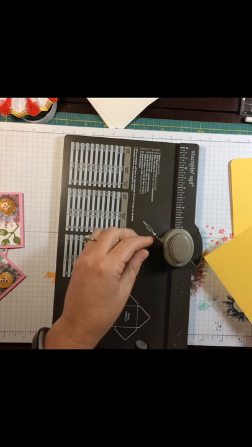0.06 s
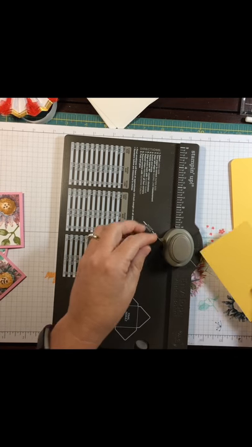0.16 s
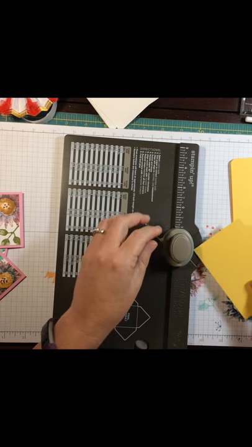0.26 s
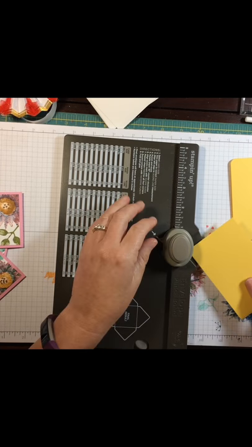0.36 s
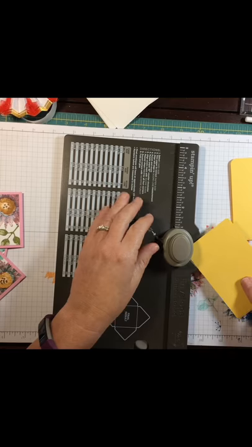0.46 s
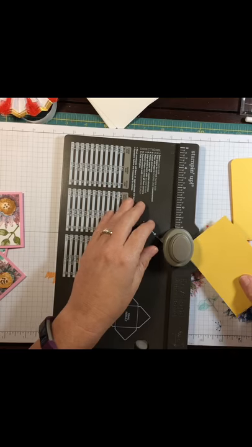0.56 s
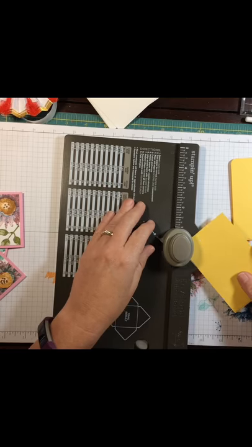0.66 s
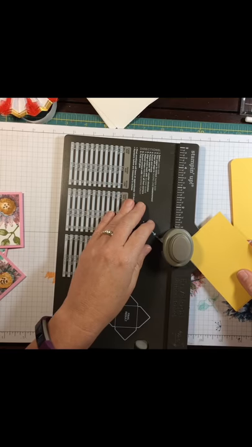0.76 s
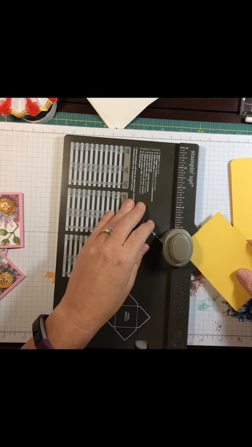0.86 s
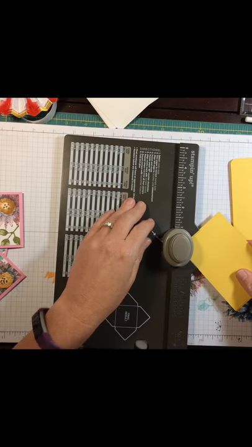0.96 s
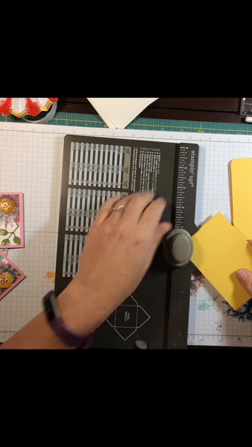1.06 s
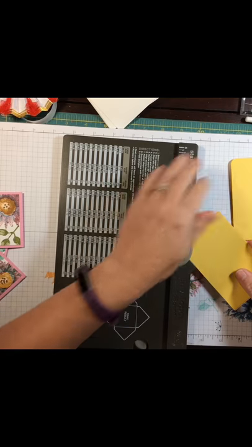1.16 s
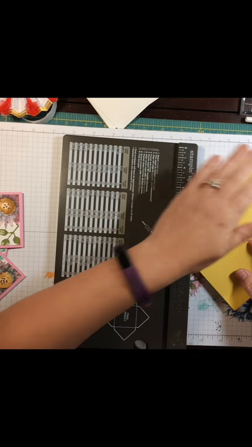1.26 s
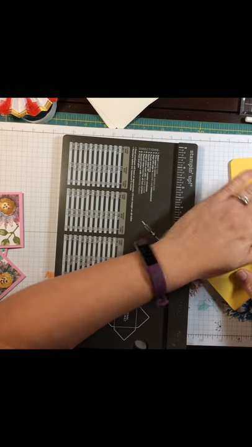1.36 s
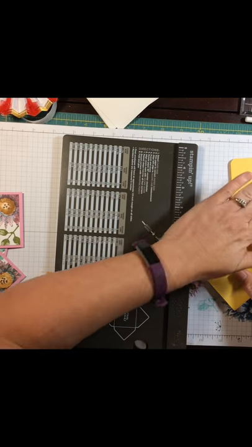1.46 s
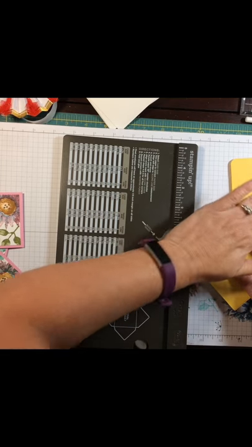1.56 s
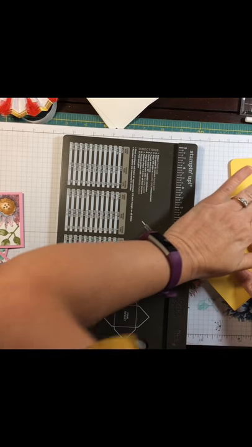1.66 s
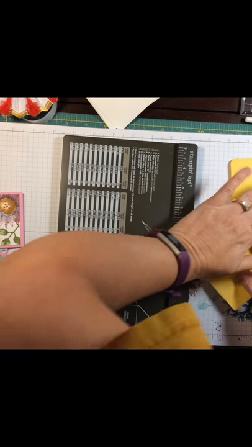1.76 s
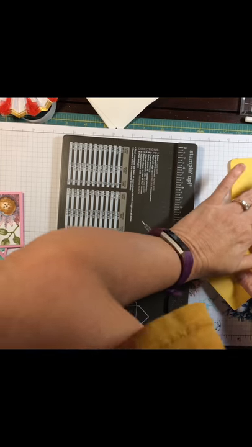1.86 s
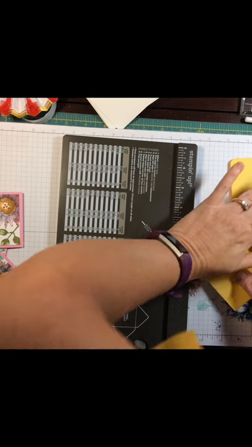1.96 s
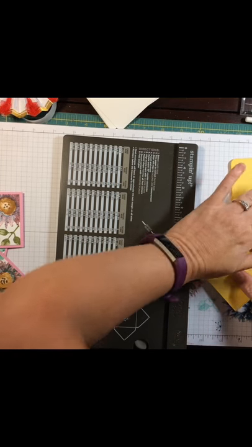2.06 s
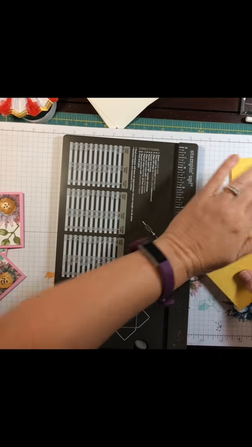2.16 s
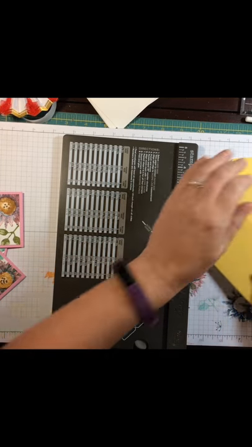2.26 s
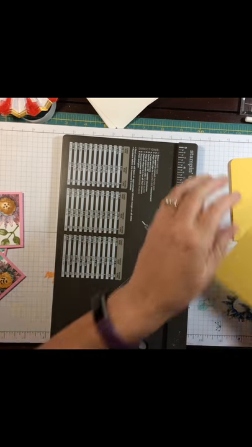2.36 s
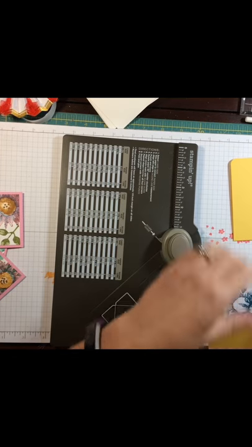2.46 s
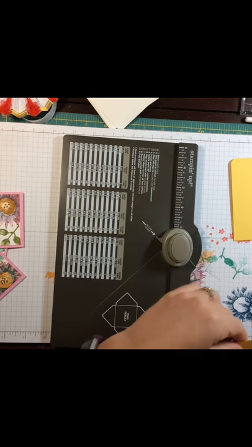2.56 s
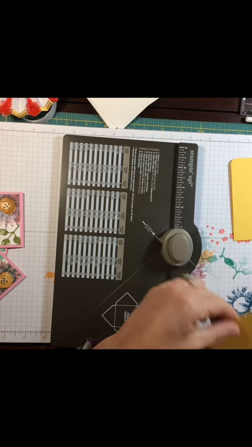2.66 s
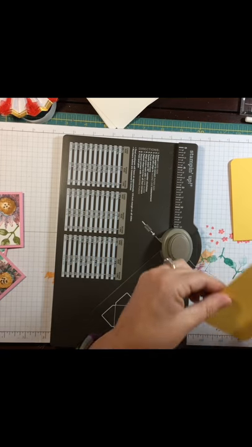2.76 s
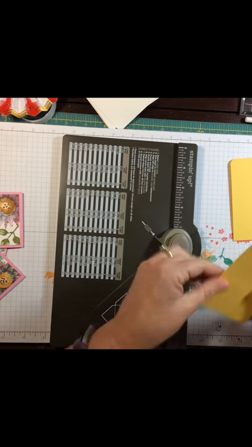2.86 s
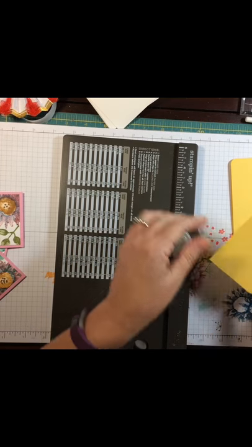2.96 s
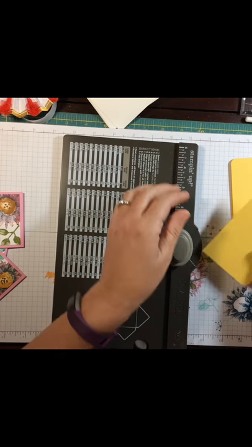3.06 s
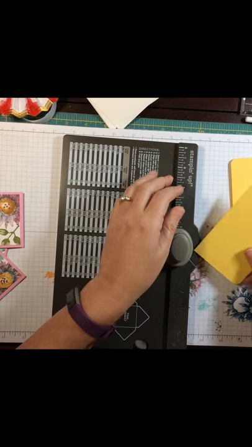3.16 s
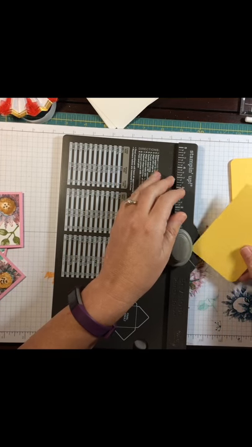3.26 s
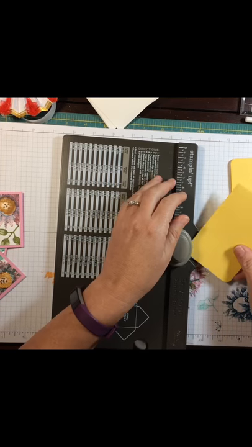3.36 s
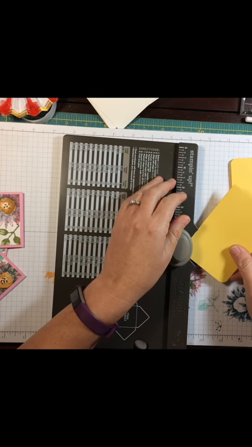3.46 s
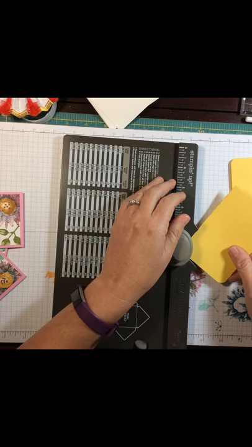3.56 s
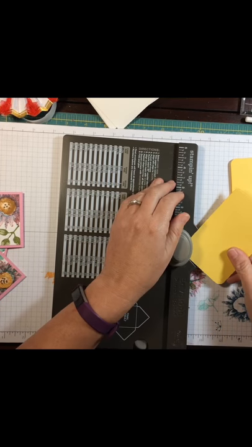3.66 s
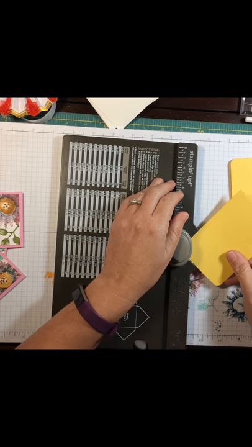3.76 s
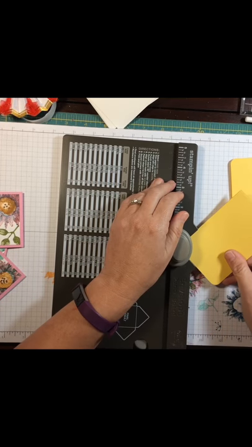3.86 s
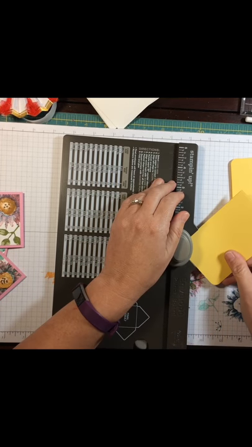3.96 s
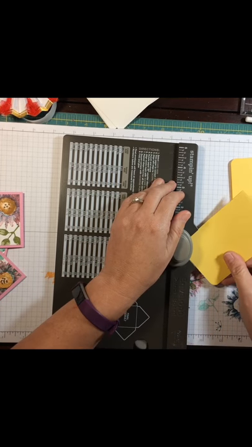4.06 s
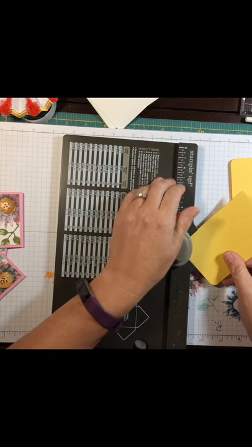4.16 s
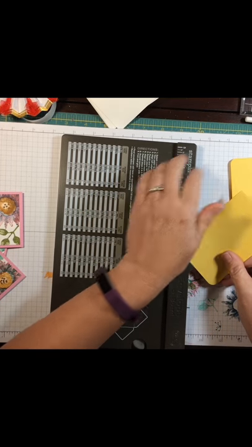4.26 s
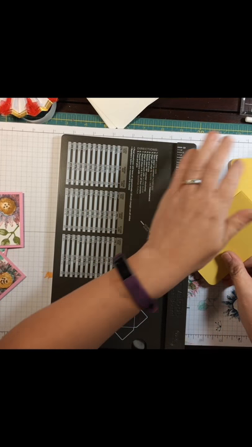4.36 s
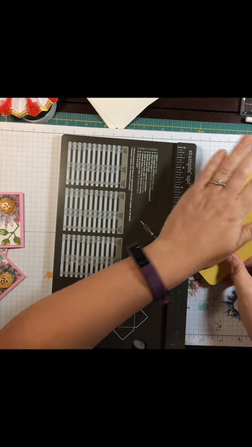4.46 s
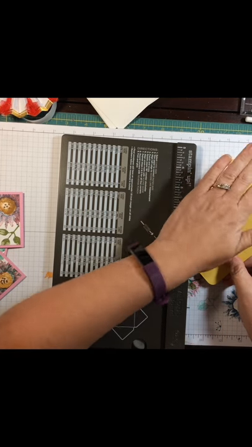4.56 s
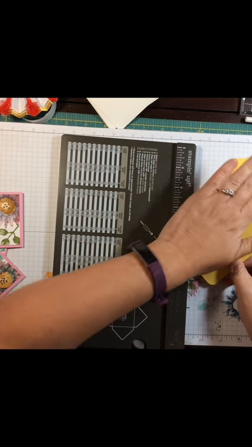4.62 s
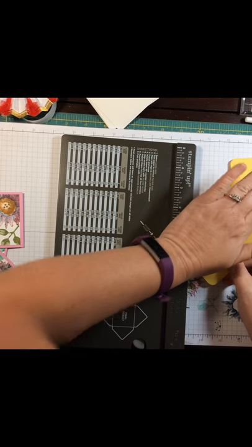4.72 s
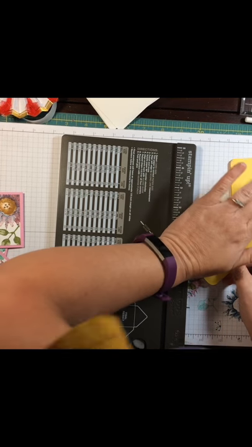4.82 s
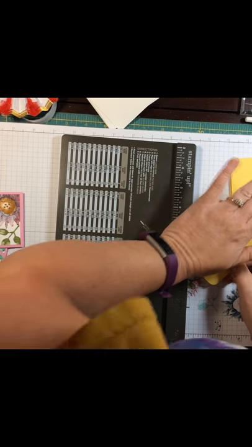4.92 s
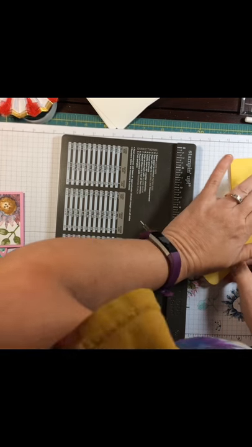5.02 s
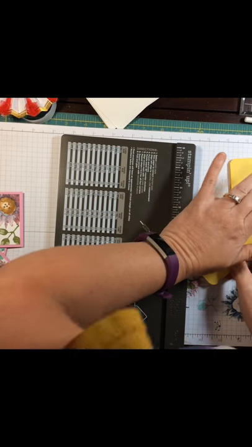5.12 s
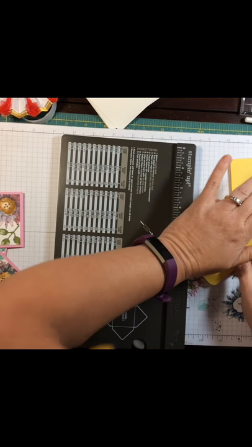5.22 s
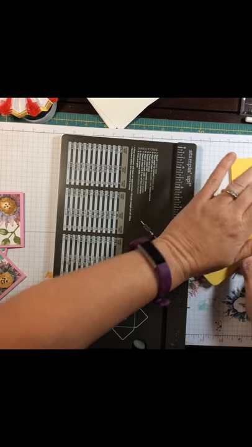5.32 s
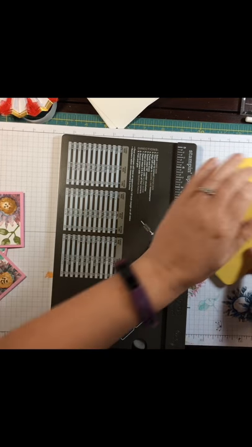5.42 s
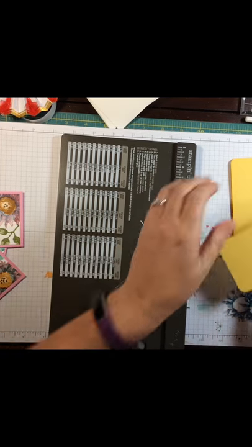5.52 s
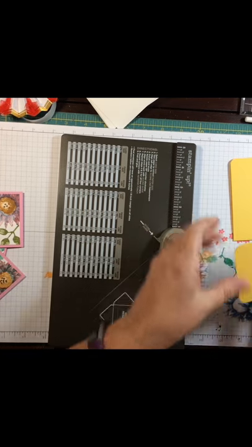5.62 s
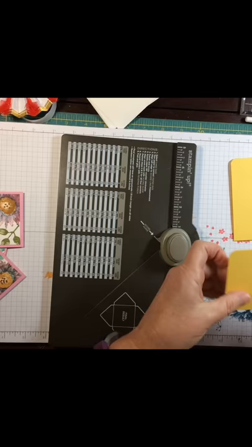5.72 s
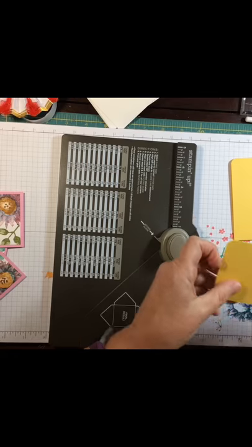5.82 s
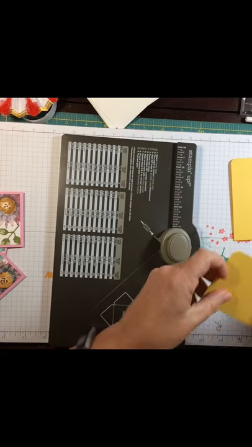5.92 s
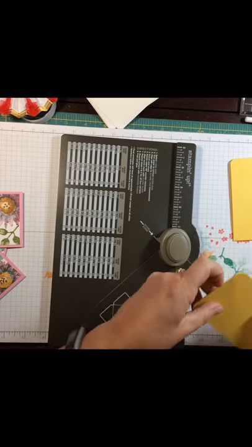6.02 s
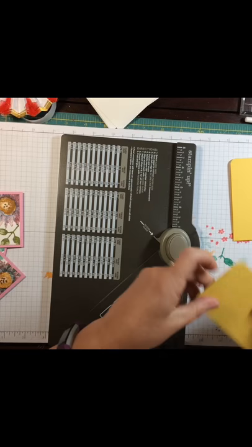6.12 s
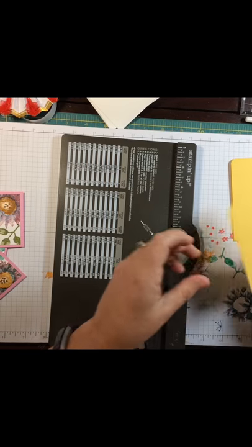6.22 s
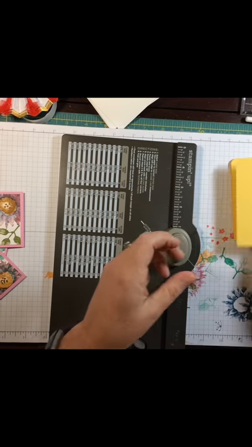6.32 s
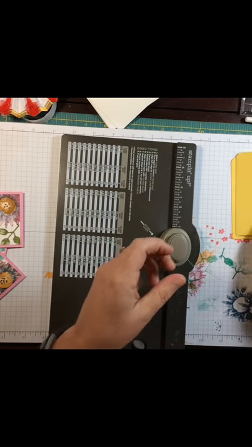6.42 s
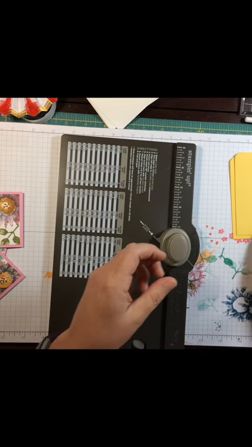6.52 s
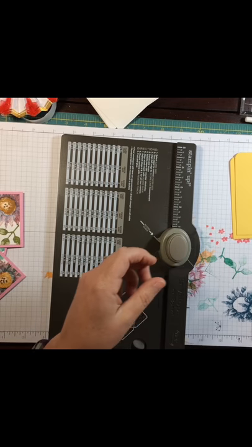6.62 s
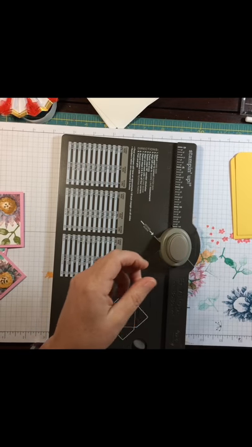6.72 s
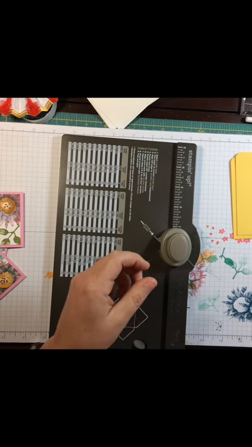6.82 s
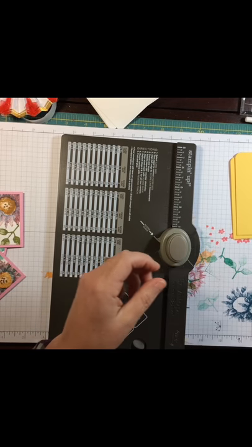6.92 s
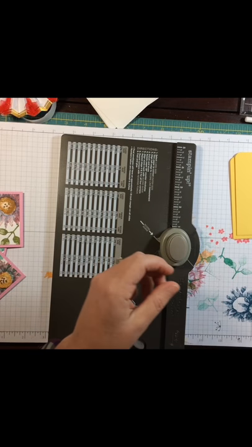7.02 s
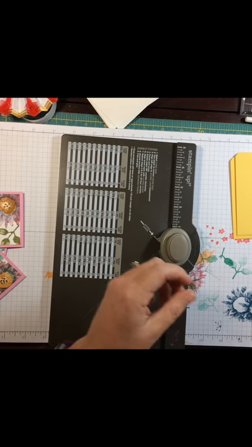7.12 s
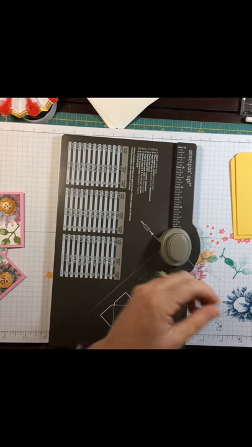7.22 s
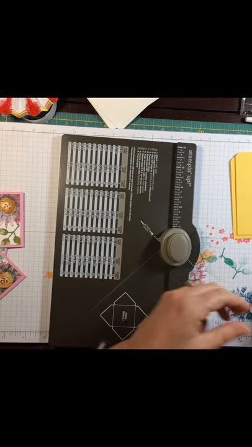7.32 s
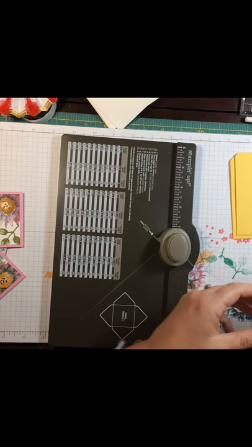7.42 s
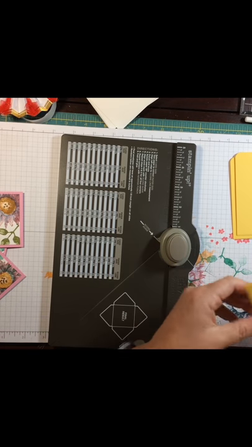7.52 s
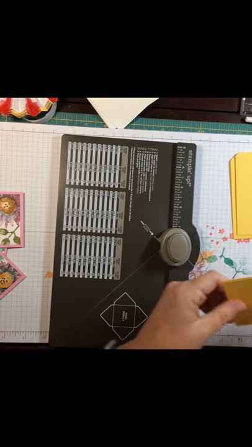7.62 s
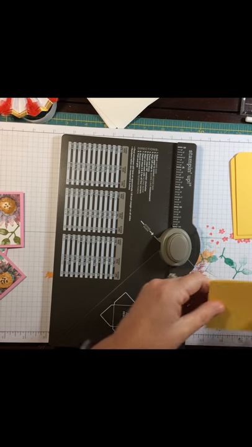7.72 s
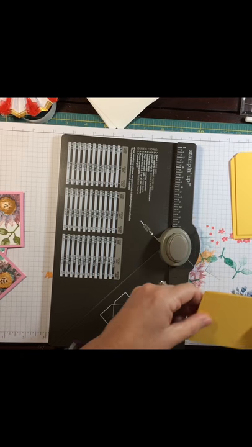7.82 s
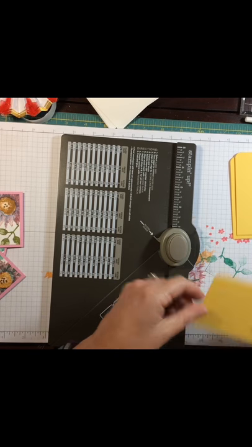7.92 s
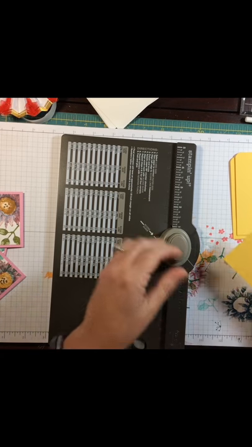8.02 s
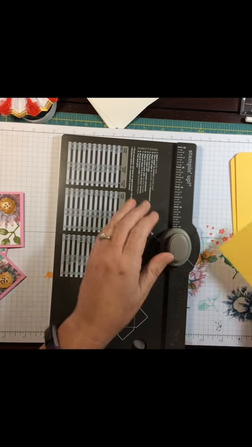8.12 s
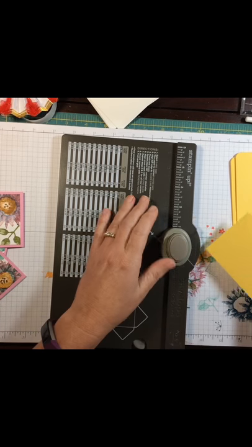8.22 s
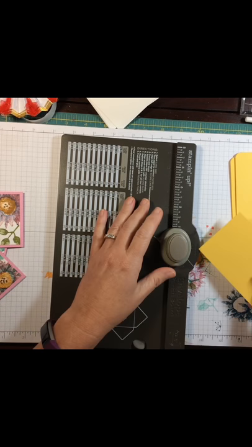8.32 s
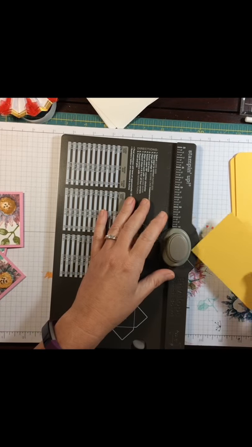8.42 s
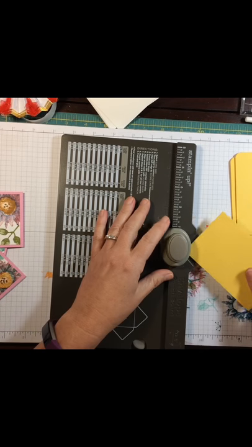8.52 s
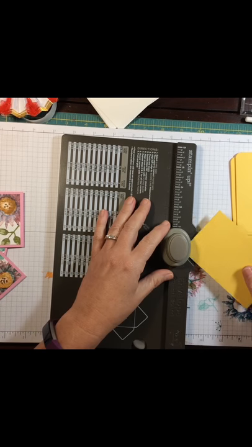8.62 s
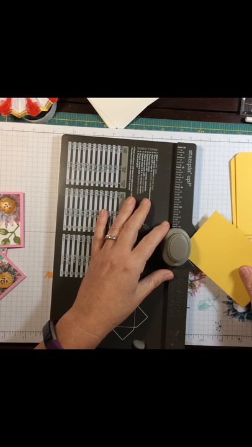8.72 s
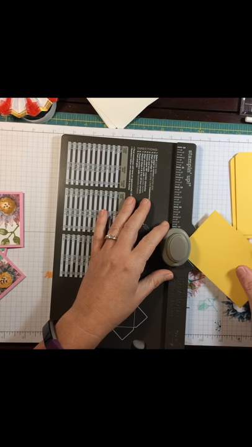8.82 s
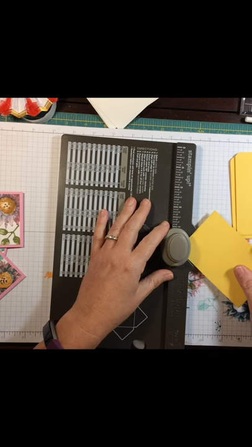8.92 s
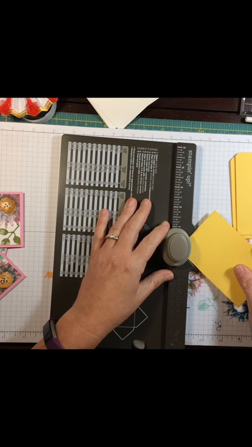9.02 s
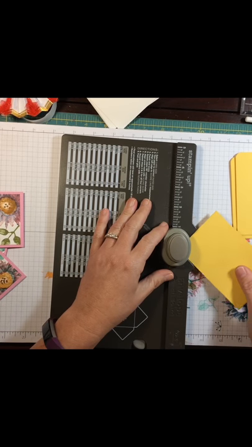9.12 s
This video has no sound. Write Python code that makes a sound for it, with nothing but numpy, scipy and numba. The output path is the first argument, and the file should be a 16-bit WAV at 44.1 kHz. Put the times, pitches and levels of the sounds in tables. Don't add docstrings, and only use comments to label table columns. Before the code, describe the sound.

Two loud, heavy clacks of a hand-pressed paper punch, with light card slides, taps and small scraps dropping in a quiet room.

```python
import sys
import numpy as np
from scipy import signal
from scipy.fft import rfft, irfft, next_fast_len
from scipy.io import wavfile
from scipy.ndimage import uniform_filter1d
from numba import njit

SR = 44100
rng = np.random.default_rng(int(sys.argv[2]) if len(sys.argv) > 2 else 0)


def gain_from_db(level_db):
    decades = np.asarray(level_db, float) / 20
    return 10 ** decades


def output_pcm(signal):
    pcm = np.clip(np.atleast_2d(signal).T, -1, 1) * 32767
    wavfile.write(sys.argv[1], SR, np.round(pcm).astype(np.int16))


N = 404838

# f/Hz, width/Hz, level/dB
MAT_MODES = [(138, 53, -1.1), (200, 61, -0.84), (250, 470, -0.85)]


def unit(x):
    return x / np.sqrt(np.mean(x ** 2))


def band(x, lo_hz, hi_hz):
    limits = [lo_hz, min(hi_hz, .45 * SR)]
    return signal.sosfilt(signal.butter(2, limits, "band", fs=SR, output="sos"), x)


def noise():
    return rng.standard_normal(N)


def coloured(points):
    size = next_fast_len(N)
    hz = np.fft.rfftfreq(size, 1 / SR)
    point_hz, point_db = np.array(points).T
    colour = gain_from_db(np.interp(np.log(hz + 1), np.log(point_hz), point_db))
    return unit(irfft(rfft(rng.standard_normal(size)) * colour, size)[:N])


def walk(rate):
    k = int(SR / rate)
    held = np.repeat(rng.standard_normal(N // k + 1), k)
    return unit(uniform_filter1d(uniform_filter1d(held, k), k)[:N])


def curve(table, column, edge_db=-120.):
    rows = np.array(table)
    return np.interp(np.arange(N) / SR, rows[:, 0], rows[:, column], left=edge_db, right=edge_db)


def ring(modes, push, detune=1., tilt_db=0.):
    hz, width, db = np.array(modes).T[:, :, None]
    t = np.arange(SR // 14) / SR
    free = gain_from_db(db + tilt_db) * np.exp(-np.pi * width * t) * np.sin(2 * np.pi * hz * detune * t)
    sound = signal.fftconvolve(free.sum(0), push)[:len(t)]
    return sound / np.abs(sound).max()


def add(out, s, sound):
    i = int(s * SR)
    out[i:i + len(sound)] += sound[:N - i]


def air():
    # f/Hz, level/dB per Hz
    air_colour = [(15, -50), (25, -4.5), (113, 5), (242, -7), (1010, -16.5), (2000, -24), (6020, -22.5),
                  (14700, -29)]
    # t/s, level/dB
    rumble_levels = [(0, -66.5), (.6, -71), (1.6, -67), (2.8, -71.5), (3.4, -69), (4.6, -69.5), (5, -67),
                     (5.4, -71), (6.2, -69), (7.5, -72), (9.18, -72.5)]
    # t/s, level/dB
    whistle_levels = [(0, -80), (2.5, -77.5), (5, -80.5), (7, -86.5), (9.18, -103)]
    # f/Hz, width/Hz, level/dB
    hum_bands = [(417, 77, -87.5), (640, 44, -90.5), (1085, 25, -89)]
    still = gain_from_db(-67.5) * coloured(air_colour)
    rumble = gain_from_db(curve(rumble_levels, 1, -72.) + .6 + 1.6 * walk(8)) * unit(band(still, 42, 120))
    whistle = gain_from_db(curve(whistle_levels, 1, -85.)) * unit(band(noise(), 5700, 7200))
    hums = sum(gain_from_db(db) * unit(band(noise(), hz - width / 2, hz + width / 2))
               for hz, width, db in hum_bands)
    return band(still, 200, 13500) * gain_from_db(1.5 * walk(5)) + rumble + whistle + hums


def strokes_of_card():
    # start t/s, end t/s, loudest level/dB, body share/dB
    rushes = [(0.552, 0.613, -72, 6), (2.146, 2.185, -58, 0), (2.214, 2.227, -65, 2),
              (2.706, 2.802, -66.5, -14.5), (3.905, 3.93, -56, 1), (5.327, 5.388, -56, 1.5),
              (5.434, 5.536, -64, -2), (5.752, 5.801, -61.5, -4), (6.212, 6.285, -73, -13.5),
              (6.406, 6.421, -73, -18.5), (6.436, 6.49, -69, -14), (6.553, 6.582, -52, -9),
              (6.92, 6.985, -63, -10), (7.181, 7.215, -53, -3), (7.321, 7.387, -50.5, -7.5),
              (8.055, 8.111, -58, -5.5), (8.769, 8.8, -78, 6.5)]
    # start t/s, end t/s, loudest level/dB, body share/dB
    settles = [(2.233, 2.304, -68.5, -1), (2.63, 2.706, -65.5, -2.5), (3.5, 3.529, -70.5, 8.5),
               (5.384, 5.43, -58, 0), (5.839, 5.951, -72.5, -12), (6.482, 6.505, -60, -10),
               (7.272, 7.326, -69, -2.5), (7.529, 7.573, -67, -12), (8.805, 8.877, -59.5, 2.5)]
    # start t/s, end t/s, level/dB, body share/dB
    drags = [(0.458, 0.551, -82, 1.5), (.61, 0.713, -79, 5.5), (0.712, 0.787, -79.5, 6.5),
             (1.586, 1.598, -72, -1), (1.153, 1.21, -77.5, -0.5), (2.3, 2.372, -70.5, -6.5),
             (2.807, 2.898, -76, -13), (2.923, 3.06, -77.5, -8.5), (3.05, 3.203, -74, -5),
             (3.211, 3.236, -70, 4), (3.47, 3.494, -66.5, 4.5), (3.93, 3.963, -82.5, 7),
             (4.281, 4.364, -75.5, 4.5), (5.578, 5.609, -73.5, -14), (5.62, 5.67, -76, -10.5),
             (6.556, 6.57, -64, -12), (6.59, 6.637, -75, 5), (7.016, 7.076, -62, -8.5),
             (7.089, 7.189, -70, -5), (7.216, 7.253, -51, -3.5), (7.409, 7.504, -79, -10),
             (7.671, 7.722, -71.5, -13), (7.717, 7.824, -67.5, -14), (7.832, 7.899, -79, -19),
             (7.93, 7.989, -77, -5.5), (7.992, 8.048, -66.5, -8), (8.595, 8.633, -78, -2),
             (8.621, 8.745, -79.5, -2.5), (7.199, 7.25, -63.5, -2.5), (9.057, 9.099, -73.5, 1),
             (9.111, 9.181, -71.5, 0.5)]
    strokes = [(start, end, -75.5, db, body_db) for start, end, db, body_db in rushes]
    strokes += [(start, end, db, -77, body_db) for start, end, db, body_db in settles]
    return strokes + [(start, end, db, db, body_db) for start, end, db, body_db in drags]


def slides():
    grains = noise() * gain_from_db(2.9 * np.minimum(rng.exponential(size=N), 6.) + 2.1 * walk(110))
    body = unit(band(grains, 950, 2900))
    hiss = unit(band(grains, 2100, 6800))
    sheen = unit(band(grains, 6000, 13500)) * gain_from_db(1.1325 * walk(36))
    flutter = .14 * unit(band(grains, 2800, 3400))
    hiss = unit(hiss + flutter) * gain_from_db(1.7 * walk(60))
    out = np.zeros(N)
    fade = .015
    for start, end, start_db, end_db, body_db in strokes_of_card():
        i = int((start - fade) * SR)
        length = int((max(end - start, 0) + 2 * fade) * SR)
        edges = signal.windows.tukey(length, min(4 * fade * SR / length, 1))
        sheen_db = -7 - .61 * body_db - .25 * (max(start_db, end_db) + 70)
        rub = (hiss + gain_from_db(body_db) * body + gain_from_db(sheen_db) * sheen)[i:i + length]
        level = gain_from_db(2.0 + np.linspace(start_db, end_db, length)) * edges
        add(out, start - fade, level[:len(rub)] * rub)
    return out


def squeaks():
    squeak_notes = [
        (.44, .62, 5100, -78),
        (7.02, 7.07, 3100, -70),
        (7.195, 7.25, 3000, -58),
        (5.47, 5.525, 5000, -72),
        (5.485, 5.545, 1950, -74),
        (4.94, 5.0, 3400, -79),
    ]
    out = np.zeros(N)
    for start, end, hz, db in squeak_notes:
        length = int((end - start) * SR)
        squeak = unit(band(rng.standard_normal(N // 8), .97 * hz, 1.03 * hz))[-length:]
        add(out, start, gain_from_db(db) * signal.windows.tukey(length) * squeak)
    return out


def contacts():
    # t/s, card level/dB, edge snap share/dB, card ring f/Hz
    flicks = [(0.591, -54, -13.5, 2000), (0.9023, -60, 0.5, 2200), (2.2166, -51, -19, 1338),
              (2.349, -60, -13, 1861), (3.478, -43, -15, 2030), (3.4936, -62, 10.5, 1790),
              (4.1765, -53, -19, 1830), (4.3017, -58.5, -15.5, 2804), (5.187, -59, -6, 2230),
              (5.8378, -47.5, 2.5, 4512), (5.8562, -58, -7, 2030), (6.1316, -55, 1.5, 1350),
              (6.1545, -54, -4, 3300), (6.283, -63, -3, 5400), (6.4665, -54, -9, 1976),
              (6.483, -38, 3, 1466), (6.9217, -50.5, -4.5, 3050), (6.9717, -52, -3, 2990),
              (7.2406, -41.5, -2, 3240), (7.378, -41, 2, 4044), (7.3862, -41, 0, 3810),
              (7.5393, -50.5, 2.5, 5291), (7.6572, -53, 0, 4291), (7.669, -51.5, -2, 2667),
              (7.7264, -54, 0, 1285), (8.209, -59, -17, 4310), (8.5935, -55.5, -21.5, 1869),
              (8.7803, -56, -21, 1871), (8.8039, -49.5, -14, 1931), (8.8229, -40, -22, 1443)]
    # t/s, board level/dB, thud share/dB, hardness/dB, card ring f/Hz
    knocks = [(1.5328, -46, -6.5, -16, 1280), (1.664, -50.5, -0.5, -8, 1340), (1.7236, -47, -6, -4, 1800),
              (1.755, -59, 5, 2.5, 2300), (1.8007, -44, -6, -2.5, 1412), (2.168, -53, 6, 2.5, 1294),
              (2.1815, -33.5, -12, 6.5, 2250), (2.186, -36, -6, 3, 3050), (2.2589, -53, -9, 2, 1346),
              (2.6367, -49, -13, 2, 1282), (2.91, -49.5, -6, 4, 2900), (2.9857, -56, -25, 0, 1310),
              (3.9255, -54, -18, -0.5, 1335), (4.6531, -43.5, -9, -22.5, 1375),
              (4.6712, -49, -28, -18.5, 1333), (4.8116, -52, -2, -28, 1301), (4.8925, -44, 0, -13, 1500),
              (4.8985, -43.5, 0.5, -3, 3200), (4.9874, -52, -8.5, 1.5, 3452),
              (5.3554, -46, -14, -17.5, 1300), (5.3774, -33, -9, 2, 2030), (5.3795, -37, -5.5, 3, 4700),
              (6.5735, -48, -12.5, 6.5, 4700), (6.577, -37.5, -11, 6, 5200)]
    # t/s, card level/dB, edge snap share/dB, card ring f/Hz
    scraps = [
        (1.897, -50.5, 12.5, 4700),
        (1.915, -55.5, 4, 4720),
        (5.089, -45, 7.5, 4690),
        (5.1042, -57, 4, 4700),
    ]
    rows = [(s, db + thud_db, db, db + hard_db, db + hard_db - 8, hz)
            for s, db, thud_db, hard_db, hz in knocks]
    return rows + [(s, db - 21, db - 12, db, db + edge_db, hz) for s, db, edge_db, hz in scraps + flicks]


def taps():
    # f/Hz, width/Hz, level/dB
    board_modes = [(300, 30, -10), (454, 100, 7), (686, 300, 12), (839.4, 79, -6), (961.5, 230, -3),
                   (1200, 93, -7), (1440, 600, -36)]
    card_modes = [(1630.3, 1600, -4.5), (2220, 660, -6), (3500, 760, -9), (5000, 490, -8)]
    edge_modes = [(6930, 1700, 20), (7900, 1000, 8), (11000, 2500, -2.5), (13500, 2100, -9.5)]
    out = np.zeros(N)
    t = np.arange(1024) / SR
    first_touch = 1.8 * np.exp(-((t - .0002) / .00003) ** 2)
    for s, mat_db, board_db, card_db, edge_db, hz in contacts():
        grit = rng.standard_normal(1024)
        spot_pitch, spot_level = rng.standard_normal((2, 26, 1))
        size = np.sqrt(hz / 2600)
        card = [(f * size, w * size, g) for f, w, g in card_modes] + [(hz, 0.17 * hz, 0.5)]
        bodies = ((MAT_MODES, mat_db, .003), (board_modes, board_db, .0025),
                  (card, card_db, .0025), (edge_modes, edge_db, .002))
        for modes, db, contact_s in bodies:
            push = grit * np.exp(-t / contact_s) * np.clip(t / 0.00019, 0, 1) - first_touch
            push = band(push, modes[0][0], 1.1 * max(modes)[0])
            count = len(modes)
            add(out, s, gain_from_db(db) * ring(modes, push, 1 + 0.035 * spot_pitch[:count], 1.5 * spot_level[:count]))
    return out


def thumps_and_ticks():
    # t/s, level/dB, f/Hz,
    # width/Hz
    short_knocks = [(0.9025, -46, 2100, 250), (1.546, -54, 900, 400), (4.83, -50, 160, 60),
                    (4.827, -56, 1050, 300), (4.986, -50, 700, 200), (4.994, -48, 750, 250),
                    (5.381, -36, 1300, 500), (6.5775, -33, 1700, 700), (6.5775, -40, 6900, 1200),
                    (9.0385, -40, 2700, 300), (9.0425, -41, 3300, 300), (5.362, -48, 620, 150),
                    (5.368, -47, 600, 150), (6.214, -60, 600, 250), (6.574, -36, 4300, 900),
                    (1.6, -52.5, 700, 200), (1.725, -41, 260, 250), (1.755, -50.5, 1100, 300),
                    (1.822, -15, 640, 170), (5.0081, -13, 600, 170), (5.0895, -44, 8500, 900),
                    (5.1065, -50, 8400, 900), (6.5773, -38, 3940, 500), (2.1155, -56, 3000, 900),
                    (2.169, -49, 4300, 698), (2.1824, -33, 1200, 250), (2.1871, -31, 370, 130.7),
                    (2.1902, -32, 760, 130), (2.195, -40, 700, 200), (3.9267, -34.5, 1350, 350),
                    (3.9272, -39.5, 780, 200), (3.93, -46, 1200, 200), (4.8978, -33.5, 950, 220),
                    (4.8992, -26, 229.5, 200), (5.3565, -48, 602, 100), (5.378, -29.5, 660, 150),
                    (5.383, -35, 814, 120), (5.3865, -33.5, 800, 150), (5.393, -42, 700, 200),
                    (6.578, -28, 340, 150), (6.604, -46, 330, 60), (6.9713, -41, 2890, 250),
                    (7.197, -52, 3040, 300), (7.243, -47, 188, 50), (7.54, -55.5, 450, 150),
                    (8.767, -56.5, 2000, 400), (9.021, -58, 2810, 700), (9.026, -46, 8040, 2500),
                    (2.9105, -51, 1900, 300), (2.9105, -55, 3500, 500), (3.214, -55, 1800, 700),
             (5.379, -33, 1800, 600), (6.5776, -42, 9500, 3000), (9.0318, -43, 11200, 2500),
             (9.0322, -29, 1500, 800), (9.0345, -44, 7300, 900), (9.041, -52, 10500, 2500)]
    out = np.zeros(N)
    for s, db, hz, width in short_knocks:
        push = np.hanning(3 + int(SR / hz / 3))
        add(out, s, -gain_from_db(db) * ring([(hz, width, 0), (1.3 * hz, width, -4)], push))
    return out


def creak():
    presses = [
        (1.502, 1.79, -72.5, -67),
        (2.103, 2.32, -71.5, -78),
        (4.628, 4.972, -77, -70.5),
        (5.302, 5.459, -74, -74),
        (6.544, 6.682, -75, -78),
        (7.194, 7.28, -78, -67.5),
    ]
    slips = noise() * gain_from_db(2.4 * walk(110))
    colour = unit(band(slips, 150, 420)) + 0.67 * unit(band(slips, 420, 910))
    pressure = sum(gain_from_db(curve([(start, start_db), (end, end_db)], 1) + 1.0)
                   for start, end, start_db, end_db in presses)
    return unit(colour) * pressure


def punch():
    # t/s, table level/dB, plate level/dB, steel level/dB, direction (1 or -1)
    strokes = [
        (1.81, -29, -47, -64, -1),
        (1.8201, -11.5, -9, -27.5, 1),
        (1.8242, -40, -11.5, -14.5, -1),
        (1.8254, -10, -5, -19, -1),
        (1.8267, -8, -8, -26, 1),
        (4.9975, -28, -53.5, -67, -1),
        (5.0066, -10, -11.5, -27, 1),
        (5.0113, -26, -6.5, -10.5, -1),
        (5.0126, -39.5, -4.5, -17, -1),
        (5.0155, -13.5, -8, -23, 1),
    ]
    # t/s, level/dB
    loads = [
        (1.8165, -30),
        (5.0025, -21),
    ]
    # f/Hz, width/Hz, level/dB
    table_modes = [(60, 42, -2.5), (74, 29, -7), (102, 150, -10), (154, 88, -4.5), (200, 60, -9),
                   (243, 25, -15)]
    plate_modes = [(215, 120, 9), (260, 140, 10), (388, 45, 0), (440, 45, 1.5), (545, 110, 2.5),
                   (690, 85, 2.5), (847, 170, -4), (1053, 110, -6), (1230, 60, -10)]
    steel_modes = [(2030, 150, -11), (2250, 770, -10), (3050, 870, 0.5), (3500, 540, 1.5),
                   (4300, 900, -1.5), (5840, 760, -11), (6900, 1100, -6.5), (8400, 1100, -9),
                   (9604, 3400, -10), (12500, 3900, -14.5)]
    out = np.zeros(N)
    t = np.arange(512) / SR
    for s, db in loads:
        add(out, s, gain_from_db(db) * ring(MAT_MODES, np.hanning(200)))
    for s, table_db, plate_db, steel_db, way in strokes:
        add(out, s, -gain_from_db(table_db) * np.sign(way) * ring(table_modes, np.hanning(200)))
        add(out, s, gain_from_db(plate_db) * np.sign(way) * ring(plate_modes, np.diff(np.hanning(30))))
        chatter = band(rng.standard_normal(512) * np.exp(-t / .003), 2200, 14000)
        add(out, s, gain_from_db(steel_db) * ring(steel_modes, chatter))
    return out


def shudder():
    # f/Hz, level/dB per Hz
    loose_colour = [(59, -32.5), (100, -3.5), (162, -0.5), (270, -7), (477, -5.5), (2200, -12.5),
                    (9150, -29.5), (15500, -43.5)]
    # f/Hz, width/Hz, level/dB
    rattle_tones = [(1440, 50, -9), (2520, 150, -3), (4680, 90, -17), (452, 41, -3), (538, 40, -6),
                    (743, 46, -7), (1053, 40, -6), (1275, 35, -11), (1780, 65, -15), (2040, 90, -12),
                    (2240, 45, -13), (2370, 90, -12), (3170, 70, -15), (3690, 90, -19)]
    # t/s, level/dB, time to fall 60 dB/s
    shudders = [
        (1.827, -24.5, 0.23),
        (5.013, -25.5, 0.23),
    ]
    loose = coloured(loose_colour) * gain_from_db(1.6 * walk(220) + 1.3 * walk(60))
    t = np.arange(SR // 14) / SR
    tones = sum(gain_from_db(db - 27.3 * width * t) * np.sin(2 * np.pi * hz * t) for hz, width, db in rattle_tones)
    jolts = noise() * gain_from_db(2.3 * walk(150))
    loose = unit(loose + gain_from_db(-1) * unit(signal.fftconvolve(jolts, tones)[:N]))
    heavy = band(loose, 40, 6000)
    thin = -band(loose, 6000, 14000) * gain_from_db(1.5)
    out = np.zeros(N)
    t = np.arange(SR // 2) / SR
    for s, db, t60 in shudders:
        for part, decay_share in ((heavy, 1), (thin, 0.96)):
            fall = gain_from_db(db - 60 * t / t60 / decay_share) * np.clip(t / 0.0026, 0, 1)
            add(out, s, fall * part[int(s * SR):][:len(t)])
    return out


def after_ring():
    # f/Hz, level/dB, time to fall 60 dB/s
    ring_tones = [(77, -31, .2), (150, -30, .2), (195, -31, .16), (297, -38, .18), (395, -37, .16),
                  (445, -32, .21), (598, -40, .18)]
    # t/s, level/dB
    starts = [
        (1.83, 0.5),
        (5.019, -1.5),
    ]
    t = np.arange(SR // 2) / SR
    after = sum(gain_from_db(db - 60 * t / t60) * np.sin(2 * np.pi * hz * t) for hz, db, t60 in ring_tones)
    after = after * np.clip(t / .006, 0, 1)
    out = np.zeros(N)
    for s, db in starts:
        add(out, s, gain_from_db(db) * after)
    return out


def snaps():
    # t/s, level/dB, f/Hz
    dry_snaps = [(2.182, -27, 3000), (5.378, -25, 3600), (6.132, -42, 3200), (6.1565, -44, 3600),
                 (6.4835, -38, 4500), (6.5772, -27, 3900), (7.0156, -56, 3750), (7.0255, -54, 3250),
                 (7.148, -54, 8000), (7.1762, -56, 3060), (7.242, -40, 4000), (7.3378, -54, 4400)]
    out = np.zeros(N)
    for s, db, hz in dry_snaps:
        modes = [(hz, .6 * hz, 0), (.4 * hz, .25 * hz, -5), (2.2 * hz, hz, -6)]
        add(out, s, gain_from_db(db) * ring(modes, np.diff(np.hanning(7))))
    return out


def corner_bounces():
    # t/s, level/dB
    bounces = [
        (9.0317, -22),
        (9.0328, -17),
        (9.0341, -29),
        (9.036, -39),
        (9.0376, -38),
        (9.0414, -37),
        (9.056, -48),
    ]
    # f/Hz, width/Hz, level/dB
    corner_modes = [(850, 270, -11), (1750, 600, 1.5), (2620, 380, 9), (3410, 400, 5), (4220, 400, -6),
                    (4810, 400, -13), (5260, 400, -14), (7300, 900, -9)]
    out = np.zeros(N)
    for s, db in bounces:
        add(out, s, gain_from_db(db) * ring(corner_modes, np.diff(np.hanning(11))))
    return out


def room(x):
    # f/Hz, time to fall 60 dB/s, level/dB
    echo_bands = [(59.7, 0.29, -0.5), (126, 0.14, 2), (250, 0.12, 3), (503.04, .2, -3), (1020, 0.15, -6),
                  (2000, 0.22, -5), (3800, 0.22, -3.5), (7700, 0.24, -2.5), (13090, 0.14, -6)]
    t = np.arange(SR // 2) / SR
    tail = np.zeros(len(t))
    for hz, t60, db in echo_bands:
        hiss = band(rng.standard_normal(len(t)), hz / np.sqrt(2), hz * np.sqrt(2))
        tail += gain_from_db(db - 60 * t / t60) * hiss / np.sqrt(t60)
    tail = tail * np.clip(t / 0.0024, 0, 1) ** 2
    tail = tail / np.sqrt(np.sum(tail ** 2))
    return x + gain_from_db(-17.5) * signal.fftconvolve(x, tail)[:N]


def scene():
    card = slides() + squeaks() + taps() + thumps_and_ticks() + snaps() + corner_bounces()
    press = creak() + punch() + shudder() + after_ring()
    return (room(card + press) + air())[None]


@njit
def follow(x, attack, release):
    y, e = np.empty(len(x)), 0.
    for i in range(len(x)):
        e += (abs(x[i]) - e) * (attack if abs(x[i]) > e else release)
        y[i] = e
    return y


def top_cut(x):
    return signal.sosfilt(signal.butter(12, 16060, fs=SR, output="sos"), x)


def record(dry):
    mic = signal.sosfilt(signal.butter(3, 45, "high", fs=SR, output="sos"), dry)
    mic = signal.sosfilt(signal.ellip(8, .2, 60, 15300, fs=SR, output="sos"), mic)
    held = follow(mic[0], 1 / (0.023 * SR), 1 / (.15 * SR))
    mix = mic * (1 + held / 0.04) ** -.22
    return top_cut(mix)


dry = scene()
out = record(dry)
output_pcm(out)
```